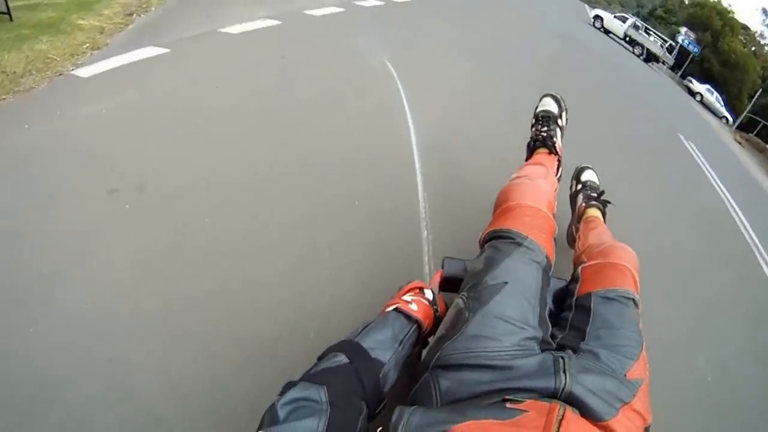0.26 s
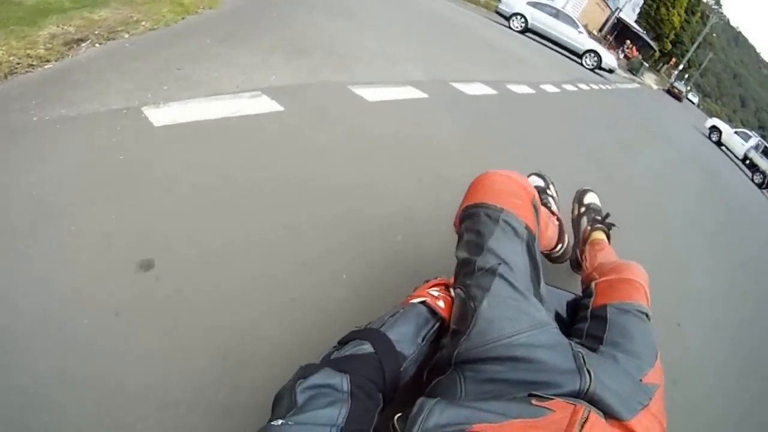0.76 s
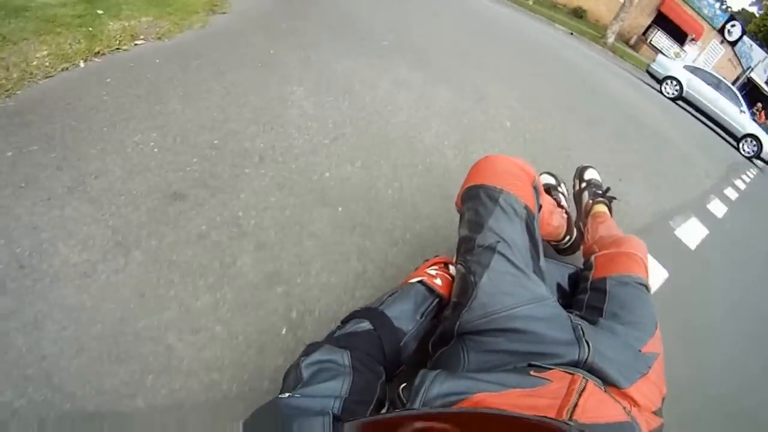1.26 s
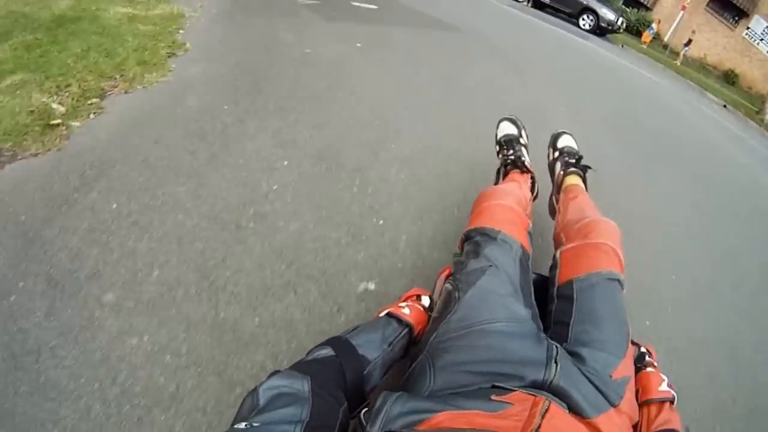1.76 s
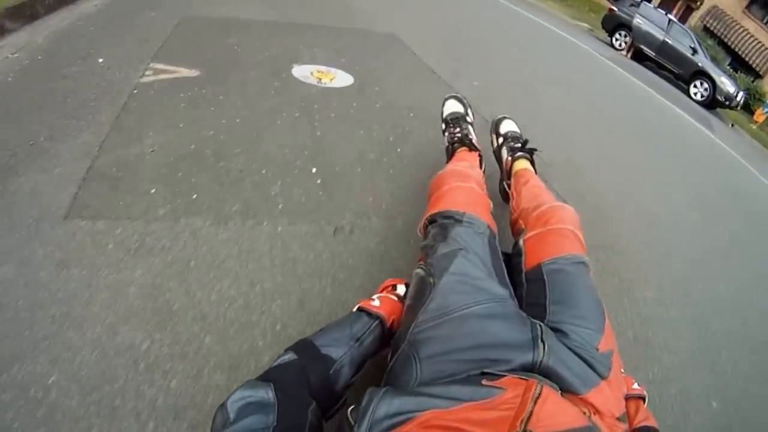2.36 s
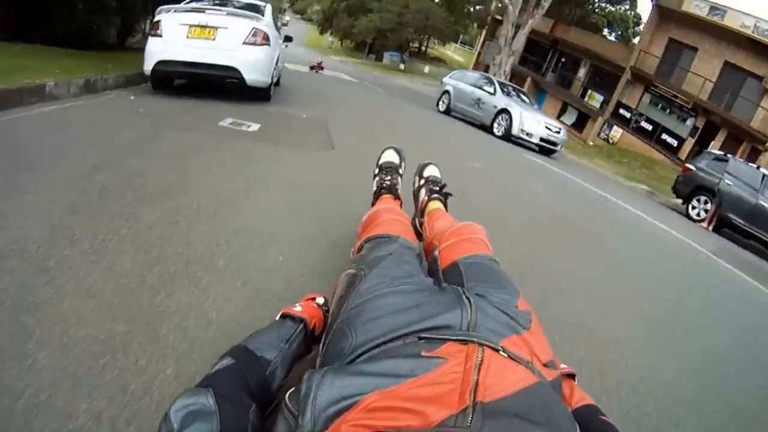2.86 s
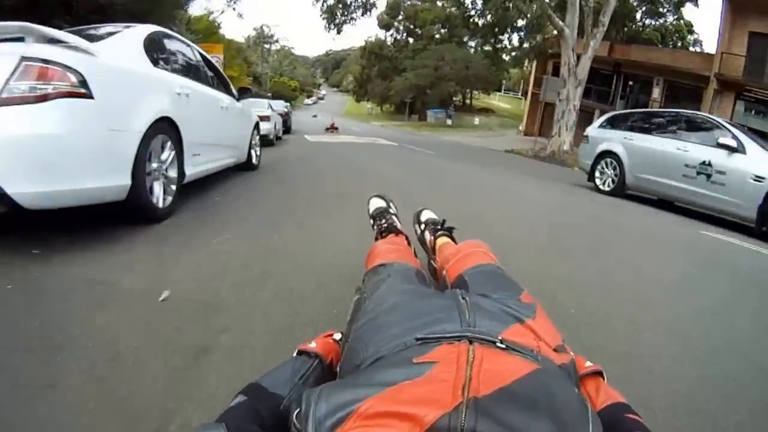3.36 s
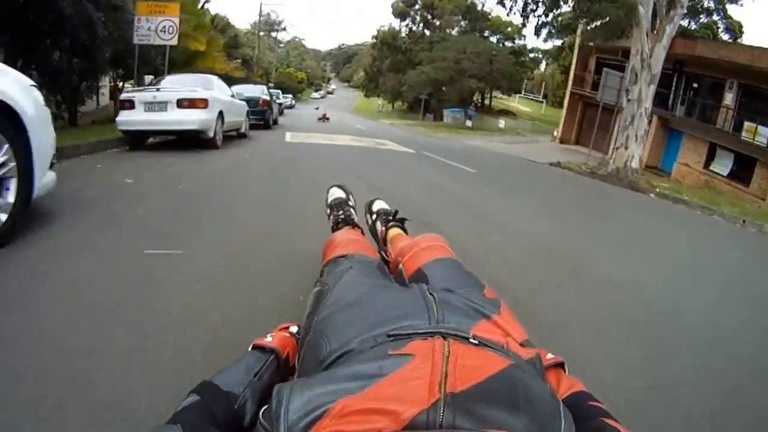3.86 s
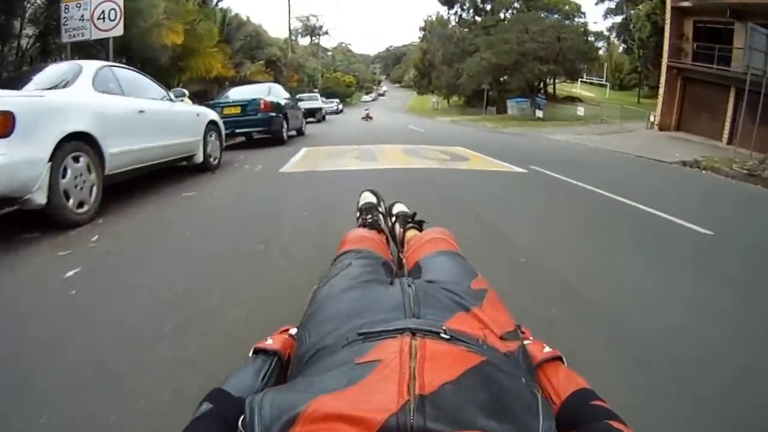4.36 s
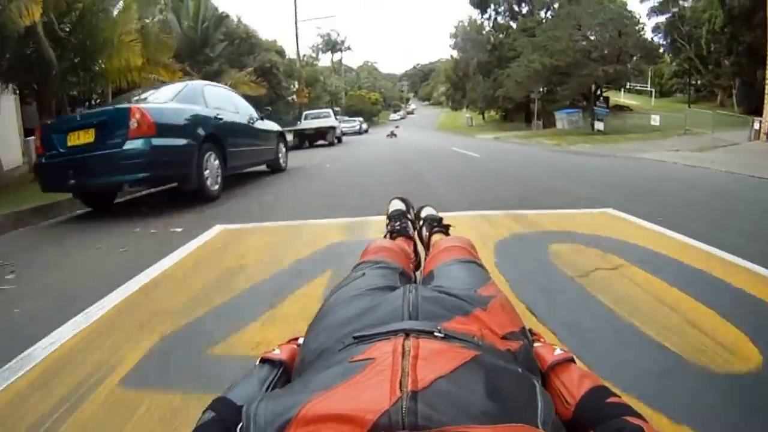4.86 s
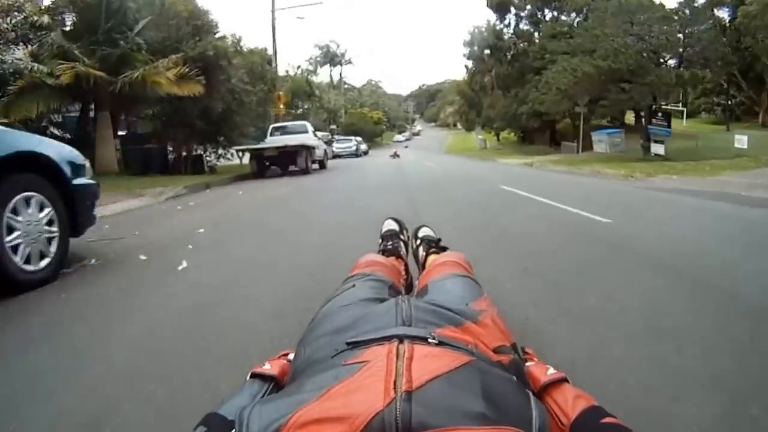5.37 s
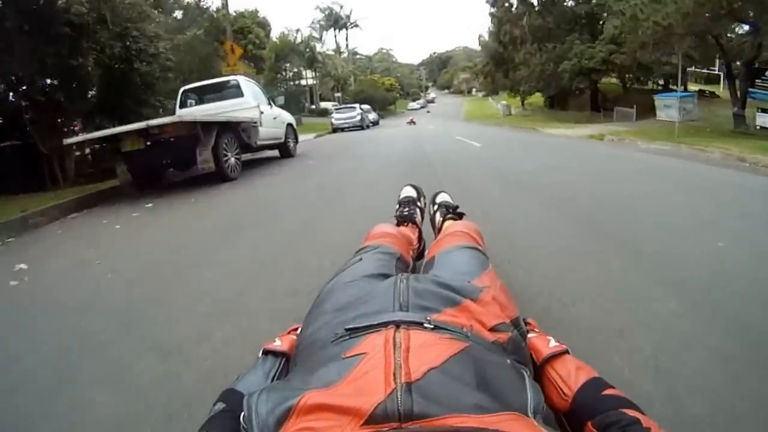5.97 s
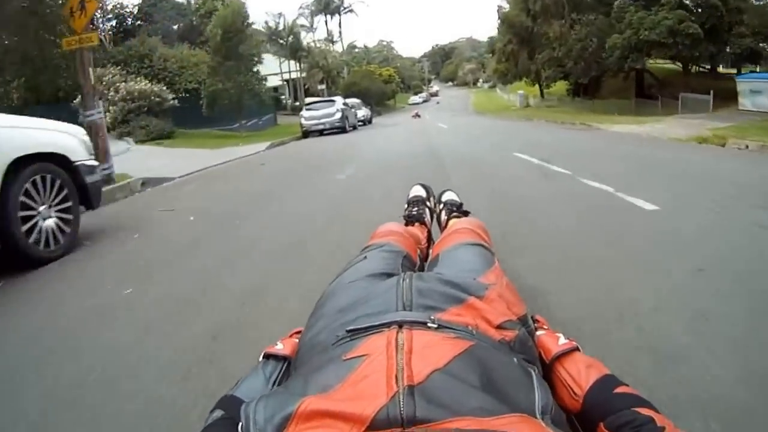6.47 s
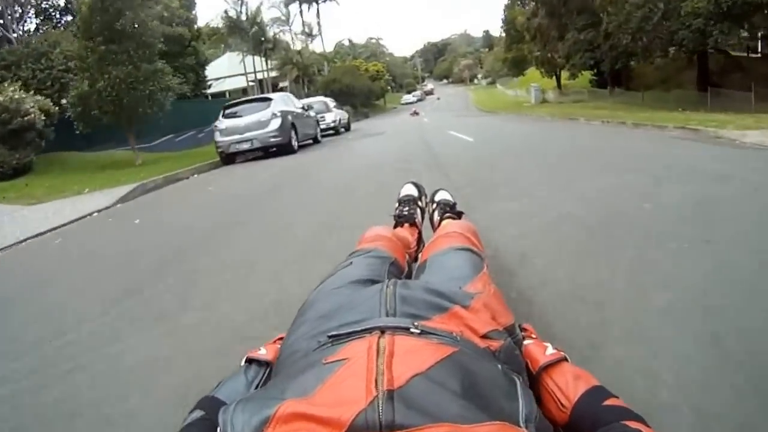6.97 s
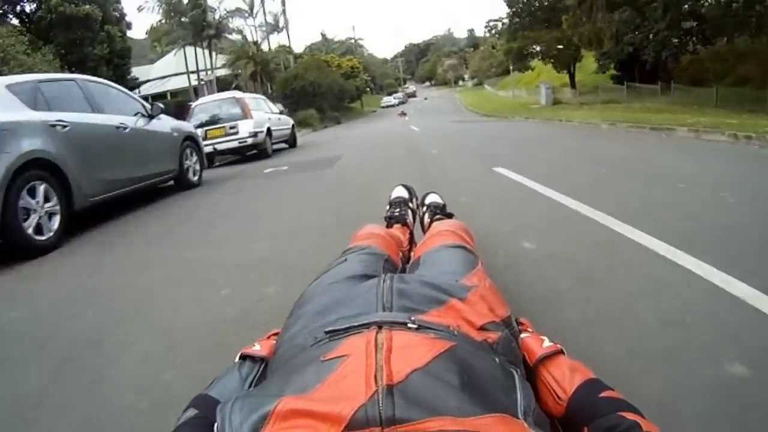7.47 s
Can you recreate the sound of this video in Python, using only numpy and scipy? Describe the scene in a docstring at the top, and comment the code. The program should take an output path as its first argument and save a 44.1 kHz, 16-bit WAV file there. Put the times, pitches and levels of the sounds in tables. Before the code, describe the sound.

A low board rolls through a bend with gritty wheel noise, scrapes sideways, then speeds away amid rising wind roar and deep thumps.

```python
"""A street luge in a bend, heard from a camera on the rider: the wheels hiss, and one sings faintly.
The wheels then judder in a sideways slide, and the wind strikes the camera as it turns out of shelter.
On the straight the wheel hum climbs in pitch, and stone crackle and wind grow with speed;
bumps make the board ring and thump.
Noise, random tiny blows and sine tones are shaped by resonances; a thin fizz is added at the end."""
import sys
import numpy as np
from scipy.fft import rfft, irfft, next_fast_len
from scipy.io import wavfile
from scipy.ndimage import map_coordinates

SR = 44100
rng = np.random.default_rng(int(sys.argv[2]) if len(sys.argv) > 2 else 0)


def persist_wave(psi):
    """Save psi, clipped to +-1, as 16-bit WAV."""
    counts = np.round(np.clip(psi, -1, 1) * 32767).astype(np.int16)
    wavfile.write(sys.argv[1], SR, np.atleast_2d(counts).T)


N = 340893
TIME = np.arange(N) / SR  # seconds

# colour of the stone chips' mid roar: f/Hz, relative level/dB
TREAD = [(90, -17), (150, 1), (220, 4.5), (280, -5), (380, 7.5), (480, 2), (600, 3.5), (700, -3.5),
         (860, 0), (950, -3), (1020, 5.5), (1100, -6.5), (1220, -7.5), (1400, -13), (1750, -21),
         (5800, -25.5)]
# colour of their bright crackle: f/Hz, relative level/dB
CHIPS = [(700, -22), (1800, -10), (2150, -27), (2400, 9.5), (2560, 9.5), (2740, 0.5), (2850, 1.5),
         (3030, -36), (3160, 1), (3420, -60), (3650, -14.5), (4100, -19), (5300, -10.5), (5900, -23)]
# colour of the fine sand ground in the turn: f/Hz, relative level/dB
SAND = [(2600, -26), (3600, 1), (5400, 2.5), (5900, -8)]
# resonance that the wheel hum passes through: f/Hz, relative level/dB
HUM = [(100, -45), (190, -13), (240, -17.5), (275, -2), (305, -7), (345, -2.5), (385, -9.5), (430, -23),
       (520, -14.5), (800, -38), (2000, -90)]
# colour of the growl of larger stones: f/Hz, relative level/dB
GROWL = [(100, -52), (190, -19), (240, -8.5), (275, 5), (330, 6.5), (385, 1.5), (440, -4), (500, -15),
         (800, -32), (2000, -90)]
# stretches of asphalt: t/s at the crossing, coarseness/dB
ASPHALT = [(0, -9), (.4, -10.5), (1.31, -1), (1.85, -2), (2.2, 1.5), (2.46, -4), (2.78, 1.5), (3.3, 2),
           (4.3, -1.5), (4.75, 2), (5.25, .5), (6.4, -1)]
# hiss of the wheels scrubbing through the turn: t/s, level/dB
TURN_HISS = [(0, -52), (1.2, -58.5), (1.55, -50.5), (2.7, -54), (4, -73)]
# a wheel sings briefly in the bend: t/s, f/Hz, relative level/dB
SQUEAL = [(.98, 850, -66), (1.05, 858, -54), (1.12, 880, -52), (1.165, 936, -55), (1.205, 947, -53),
          (1.25, 890, -50), (1.32, 830, -56), (1.38, 810, -80)]
# the wheels judder as they slide on rough asphalt: t/s, f/Hz, relative level/dB
JUDDER = [(1.3, 61.1, -75), (1.42, 61.5, -38), (1.58, 66, -38), (1.74, 64.8, -34.5), (1.86, 69.7, -42),
          (1.98, 68, -75)]
# loose grit and seams: start t/s, relative level/dB, time to fall 20 dB/s, snap against flurry/dB
SCRUNCHES = [(0.148, -47.5, 0.24, -22), (0.296, -42, .03, -1), (0.649, -41.5, .06, -16),
             (1.41, -38, 0.026, -23), (1.532, -31, 0.023, -18), (1.578, -27.5, 0.025, -17),
             (1.65, -27, 0.013, -1.5), (1.814, -41, 0.018, 8), (1.851, -34, 0.02, -1),
             (1.878, -29, 0.0085, 5), (1.974, -38.5, 0.044, -4), (2.043, -32.5, 0.032, -6),
             (2.459, -35, 0.099, -16), (2.52, -36, 0.06, -5), (2.62, -41, 0.04, 4.5),
             (2.972, -31, 0.037, -8), (3.13, -36.5, 0.029, 5), (3.518, -26.5, 0.019, -8),
             (4.378, -41, 0.018, -1), (4.862, -37, .05, 5), (5.171, -38, .03, 5), (5.499, -34.5, 0.17, -3)]
# colours of the cracks and of the sharper snaps: f/Hz, relative level/dB
CRACK = [(200, -25), (600, -6), (1050, 6), (1700, -13), (2550, 9), (3200, -22), (5900, -29)]
SNAP = [(1500, -12), (3200, -3), (5900, -12.5)]
# hollow knocks at the edges of road patches: start t/s, relative level/dB, f/Hz, time to fall 60 dB/s
KNOCKS = [(1.311, -24.5, 296, 0.11), (2.622, -29.5, 604, 0.098)]
# bumps in the road: start t/s, strength/dB, relative level of the board's upper mode/dB
BUMPS = [(0.936, -45, 11), (2.497, -20.5, -1), (2.56, -13, -12), (2.986, -11, -8.5), (3.018, -11.5, -10),
         (3.107, -16, -5), (3.756, -6, -18), (3.956, -10.5, -11), (4.028, -8, -17), (4.213, -9.5, -21),
         (4.751, -25, -21), (4.91, -5, -39), (4.983, -7.5, -16), (5.127, -13, -17), (5.626, -9.5, -13),
         (6.206, -24, -15), (6.789, -13, -24)]
# uneven stretches that set the board shuddering: start t/s, length/s, level/dB
RIPPLES = [(0.915, .05, -38.5), (2.488, 0.06, -33), (2.97, 0.22, -28), (3.72, 0.348, -25.5),
           (4.2, .35, -24.5), (4.72, .08, -21.5), (4.862, .14, -22.5), (5.097, 0.13, -23.5),
           (5.5, 1.35, -25.5), (6.17, 0.076, -17.5), (7.55, 0.14, -28)]
# resonances of the shuddering board: f/Hz, relative level/dB
BOARD = [(30, -55), (55, -1.5), (70, -8), (83, 8), (94, -0.5), (108, -13.5), (135, -25), (165, -28),
         (195, -24.5), (235, -35), (400, -41.5), (1200, -100)]
# colour of the wind's slow pushes: f/Hz, relative level/dB
BUFFET = [(4, 1), (11, 3.5), (30, 1.5), (50, -2), (80, -16.5), (120, -23), (200, -34), (500, -45),
          (1500, -100)]
# colour of the low air roar: f/Hz, relative level/dB
ROAR = [(90, 10), (140, 0.5), (190, 1), (245, -1), (400, -4), (520, -5.5), (720, -10), (900, -3.5),
        (1020, 2.5), (1150, 0.5), (1280, 1), (1420, -2.5), (1560, 1.5), (1830, -8.5), (2300, -8.5),
        (5000, -19.5)]
# camera housing resonances, lower part: f/Hz, relative level/dB
RUSH = [(900, -71), (1800, -15.5), (2060, -1.5), (2210, 1.5), (2450, -5.5), (2720, -11), (2860, -7.5)]
# camera housing resonances, upper part: f/Hz, relative level/dB
HISS = [(3050, -16.5), (3450, -14.5), (3900, -22.5), (4350, -28.5), (4770, -19), (5150, -38), (5400, -31),
        (5900, -44.5)]
# gusts and lulls: middle t/s, length/s, change of buffeting level/dB
GUSTS = [(1.483, 0.35, 12.5), (2.98, 0.087, 10), (3.377, 0.5, -5), (3.788, 0.27, 5), (4.498, .1, 4),
         (5.136, 0.094, 7.5), (5.575, 0.098, 6), (5.76, 0.12, -11), (5.984, .2, 5), (6.55, .16, 0),
         (7.103, 0.89, -2.5), (7.63, 0.14, 9)]

# The pace is even in the bend, then heads towards a top speed.
BEND_SPIN_HZ, TOP_SPIN_HZ = 47.88, 150  # wheel turns per second
RELEASE_S, GATHER_S = 1.87, 7.25  # start of the speeding up, and its time constant
CRUISE_SPIN_HZ = 75  # the spin at which speed_db is 0
CROSSING_S = .04  # time to roll onto new asphalt
SLIDE_S, SLIDE_ATTACK_S, SLIDE_HOLD_S, SLIDE_RELEASE_S = 1.323, 0.094, 0.21, 0.68
STRAIGHT_S, STRAIGHTENING_S = 3.3, 1.5  # when the turn starts to ease, and how long that takes

# Base levels in dB; a coarse share is the part of the coarseness that a layer follows.
TREAD_DB, TREAD_COARSE_SHARE, TREAD_SLIDE_DB, TREAD_TURN_DB = -49, 0.73, 5, 2
CHIPS_DB, CHIPS_COARSE_SHARE, CHIPS_SPEED_POWER, CHIPS_SLIDE_DB = -52, 0.34, 1.1, 4
SAND_DB, HUM_DB = -63, -41
RUMBLE_DB, RUMBLE_COARSE_SHARE, RUMBLE_SPEED_POWER = -36.5, 0.71, 2.15
SHUDDER_ATTACK_S, SHUDDER_T60_S = 0.012, 0.16  # t60: time to fall 60 dB
SCRUNCH_ATTACK_S = .007
BUFFET_DB, SHELTER_DB = -28, -20.5  # buffeting in the open, and its change in shelter
EXPOSED_S, EXPOSING_S = 2.24, 0.3  # when the camera turns into the wind, and how long that takes
ROAR_DB, ROAR_SPEED_POWER = -40.5, 3.15
RUSH_DB, RUSH_SPEED_POWER = -43.5, 4.93
GUST_RUSH_SHARE = 0.19  # part of a gust's dB that reaches the bright rush
HOLD_HZ, TOP_HZ = 12000, 15330  # rate of the camera's held samples, and top of its range


def wheels():
    """Stone chips drum on the wheels: a mid roar and a bright crackle, with fine sand in the turn."""
    coarse_db, scrub = coarseness_db(), sliding()
    turning = np.clip(1 - (TIME - STRAIGHT_S) / STRAIGHTENING_S, 0, 1)
    tread_db = TREAD_DB + TREAD_COARSE_SHARE * coarse_db
    tread_db = tread_db + TREAD_SLIDE_DB * scrub + TREAD_TURN_DB * turning
    chips_db = CHIPS_DB + CHIPS_COARSE_SHARE * coarse_db
    chips_db = chips_db + CHIPS_SPEED_POWER * speed_db() + CHIPS_SLIDE_DB * scrub
    texture_db = 1.45 * wobble(45)  # rougher and smoother spots, shared by all three layers
    tread_gain = amp(tread_db + texture_db + 0.54 * wobble(60))
    tread = tread_gain * coloured(impacts(1600, spread_db=5), TREAD)
    chips_gain = amp(chips_db + texture_db + 3.0 * wobble(70))
    chips = chips_gain * coloured(impacts(1400, spread_db=6.5), CHIPS)
    sand_gain = turning * amp(SAND_DB + coarse_db + texture_db)
    sand = sand_gain * coloured(impacts(700, spread_db=7), SAND)
    return tread + chips + sand


def hum():
    """Uneven wheels drone at multiples of their spin, which climb through a fixed resonance."""
    uneven_spin = spin_hz() * (1 + .014 * wobble(12))
    angle = 2 * np.pi * np.cumsum(uneven_spin) / SR
    tones = np.zeros(N)
    for k in range(2, 6):  # multiples of the spin
        tones += wobble(20) * np.cos(k * angle) + wobble(20) * np.sin(k * angle)
    clear_db = np.interp(TIME, [1.2, 2.8], [-6, 1.5])  # the tones stand out more after the bend
    growl = coloured(impacts(260, spread_db=4.5), GROWL)  # the larger stones
    drone_sound = steadied(amp(clear_db) * coloured(tones, HUM) + growl, span_s=0.22)
    fade_db = np.interp(TIME, [5.5, 7.5], [-.5, -3])  # the drone sinks a little late on
    return amp(HUM_DB + coarseness_db() + fade_db + 2.6 * wobble(14)) * drone_sound


def scrubbing():
    """The wheels hiss through the turn, coloured by the same housing as the wind."""
    hiss_db, = curves(TURN_HISS)
    flutter_db = 1.6 * wobble(120) + 1.2 * wobble(30.9)
    return amp(hiss_db + flutter_db) * coloured(rng.standard_normal(N), RUSH + HISS)


def cornering():
    """Slipping wheels oscillate: one sings faintly in the bend, then the set judders sideways."""
    squeal = slip(SQUEAL, jitter=0.017, flutter_db=4.0)
    judder = slip(JUDDER, jitter=0.093, flutter_db=7.5)
    return amp(-0.5) * (squeal + judder)


def slip(track, jitter, flutter_db):
    """A slipping wheel oscillates unsteadily along a track of time, pitch and level."""
    pitch_hz, db = curves(track)
    phase = 2 * np.pi * np.cumsum(pitch_hz * (1 + jitter * wobble(150))) / SR
    return amp(db + flutter_db * wobble(45.3)) * np.sin(phase)


def scrunches():
    """Loose grit gives short flurries of cracks, each with some share of sharper snaps."""
    flurry, snaps = np.zeros(N), np.zeros(N)
    for s, db, length, snap_db in SCRUNCHES:
        age = np.maximum(TIME - s, 0)
        burst = amp(db - 20 * age / length) * (1 - np.exp(-age / SCRUNCH_ATTACK_S))
        flurry += burst
        snaps += burst * amp(snap_db)
    stones = impacts(3000, spread_db=2.0)
    cracking = amp(-1.5) * flurry * coloured(stones, CRACK)
    snapping = amp(-4.5) * snaps * coloured(stones, SNAP)
    return cracking + snapping


def knocks():
    """The wheels drop off an edge and the chassis rings hollowly."""
    ring = np.zeros(N)
    for s, db, hz, t60 in KNOCKS:
        age = np.maximum(TIME - s, 0)
        envelope = amp(db - 60 * age / t60) * (1 - np.exp(-age / 0.013))
        ring += envelope * np.sin(2 * np.pi * hz * age)
    return ring


def board():
    """The loaded board shudders at its bending resonance; each bump shoves it and lets it ring."""
    thumps = np.zeros(N + SR)  # with room for the last ring
    t = np.arange(SR // 3) / SR
    for s, db, upper_db in BUMPS:
        modes = [(78.6, -7.5, 0.043), (183, upper_db + 0.5, 0.033)]  # f/Hz, level/dB, t60/s
        ring = np.zeros(len(t))
        for hz, level, t60 in modes:
            ring += amp(level - 60 * t / t60) * np.sin(2 * np.pi * hz * t)
        ring *= 1 - np.exp(-t / 0.0012)  # soft start
        # hard bumps bottom out the bushings: the shove grows faster than the ring
        shove = amp(db) * np.sin(np.pi * np.minimum(t / .01, 1)) ** 2
        thumps[round(s * SR):][:len(t)] += amp(db) * (shove + ring)
    shudder = amp(shudder_db() + 0.42 * wobble(22)) * drone(BOARD, span_s=0.18)
    return shudder + thumps[:N]


def wind():
    """Slow eddies push on the camera; smaller ones roar past it and make its housing rush and flutter."""
    gust_db = sum(db * np.exp(-(2 * (TIME - s) / length) ** 2) for s, length, db in GUSTS)
    sheltered = np.clip(1 - (TIME - EXPOSED_S) / EXPOSING_S, 0, 1)
    buffet_db = BUFFET_DB + SHELTER_DB * sheltered + gust_db
    buffet = amp(buffet_db) * drone(BUFFET, span_s=0.34)
    roar_db = ROAR_DB + ROAR_SPEED_POWER * speed_db() - 2.55 * sheltered
    roar_noise = amp(1.4 * wobble(170)) * rng.standard_normal(N)
    roar = amp(roar_db) * coloured(roar_noise, ROAR)
    rush_db = RUSH_DB + RUSH_SPEED_POWER * speed_db() + GUST_RUSH_SHARE * gust_db + 0.7 * wobble(14)
    eddies = amp(1.13 * wobble(170) + 0.51 * wobble(35))
    rush = amp(rush_db) * coloured(eddies * rng.standard_normal(N), RUSH + HISS)
    return buffet + roar + rush


def spin_hz():
    """Wheel turns per second: steady, then closing in on the top speed ever more slowly."""
    gathering = np.exp(-np.maximum(TIME - RELEASE_S, 0) / GATHER_S)
    return TOP_SPIN_HZ - (TOP_SPIN_HZ - BEND_SPIN_HZ) * gathering


def speed_db():
    """Speed against the cruising speed, in dB."""
    return 20 * np.log10(spin_hz() / CRUISE_SPIN_HZ)


def coarseness_db():
    """Coarseness of the asphalt under the wheels, with a short ramp at each crossing."""
    starts, db = np.transpose(ASPHALT)
    coarse_db = db[0]
    for s, step in zip(starts[1:], np.diff(db)):
        coarse_db = coarse_db + step * np.clip((TIME - s) / CROSSING_S + .5, 0, 1)
    return coarse_db


def sliding():
    """How hard the wheels scrub sideways, 0 to 1."""
    corners = np.cumsum([SLIDE_S, SLIDE_ATTACK_S, SLIDE_HOLD_S, SLIDE_RELEASE_S])
    return np.interp(TIME, corners, [0, 1, 1, 0])


def shudder_db():
    """The board shakes harder with speed and coarseness; uneven stretches add their own power."""
    rumble_db = RUMBLE_DB + RUMBLE_COARSE_SHARE * coarseness_db() + RUMBLE_SPEED_POWER * speed_db()
    power = amp(rumble_db) ** 2
    for s, length, db in RIPPLES:
        attack = np.clip((TIME - s) / SHUDDER_ATTACK_S, 0, 1)
        time_after = np.maximum(TIME - s - length, 0)
        power = power + (attack * amp(db - 60 * time_after / SHUDDER_T60_S)) ** 2
    return 10 * np.log10(power)


def impacts(per_second, spread_db):
    """Randomly timed tiny blows of uneven size, at rms 1."""
    hit = rng.random(N) < per_second / SR
    size = amp(spread_db * np.clip(rng.standard_normal(N), -2, 2))
    direction = np.sign(rng.standard_normal(N))
    return unit(hit * size * direction)


def drone(points, span_s):
    """Coloured noise of even loudness."""
    return steadied(coloured(rng.standard_normal(N), points), span_s)


def steadied(x, span_s):
    """x at rms 1, with its loudness evened out over times longer than about span_s."""
    power = filtered(unit(x) ** 2, lambda hz: np.exp(-(hz * span_s) ** 2))
    return unit(x / np.sqrt(np.abs(power) + 0.18))


def coloured(x, points):
    """x through a body with the given response (f/Hz, level/dB), at rms 1."""
    f, db = np.transpose(points)
    return unit(filtered(x, lambda hz: amp(np.interp(np.log(hz + 1), np.log(f), db))))


def filtered(x, response):
    """x with each frequency scaled by response(hz)."""
    m = next_fast_len(N + 8192)  # padding keeps the end from wrapping onto the start
    return irfft(rfft(x, m) * response(np.fft.rfftfreq(m, 1 / SR)), m)[:N]


def wobble(rate):
    """A smooth random curve through rate random points a second."""
    return map_coordinates(rng.standard_normal(4096), [TIME * rate + 2], mode="wrap")


def curves(rows):
    """One value per sample for each column after the time."""
    s, *columns = np.transpose(rows)
    return [np.interp(TIME, s, column) for column in columns]


def unit(x):
    """Scale to rms 1."""
    return x / np.sqrt(np.mean(x ** 2) + 1e-20)


def amp(db):
    """Decibels to gain."""
    return 10 ** (np.asarray(db) / 20)


def scene():
    """All sources reach one microphone, so both channels are the same."""
    wheel_sounds = wheels() + hum() + scrubbing() + cornering()
    road_sounds = scrunches() + knocks() + board()
    mono = wheel_sounds + road_sounds + wind()
    return np.array([mono, mono])


def record(dry):
    """The camera's held samples mirror the sound around the hold rate, heard as a thin fizz."""
    base = filtered(dry[0], lambda hz: np.interp(hz, [5400, 5900, 6500], [1, .4, 0]))
    mirrored = 2 * base * np.cos(2 * np.pi * HOLD_HZ * TIME)
    # holding weakens the mirror most close to the hold rate
    fizz = filtered(mirrored, lambda hz: (hz - HOLD_HZ) / np.maximum(hz, HOLD_HZ / 2))
    out = filtered(base + amp(.3) * fizz, lambda hz: np.clip((TOP_HZ - hz) / 100 + .5, 0, 1))
    return np.array([out, out])


dry = scene()
out = record(dry)
persist_wave(out)
```